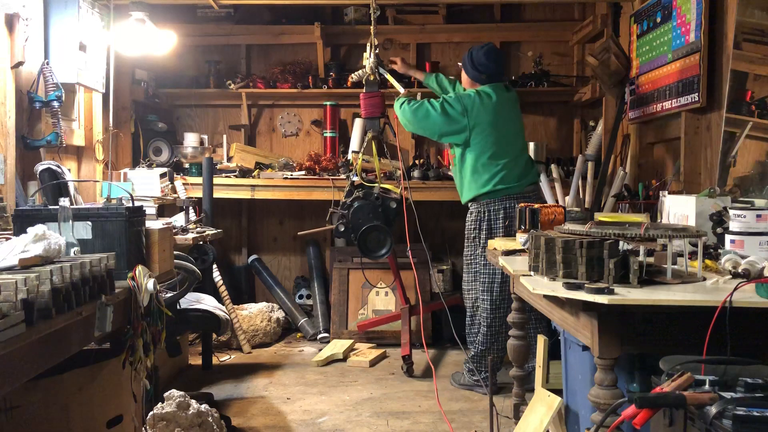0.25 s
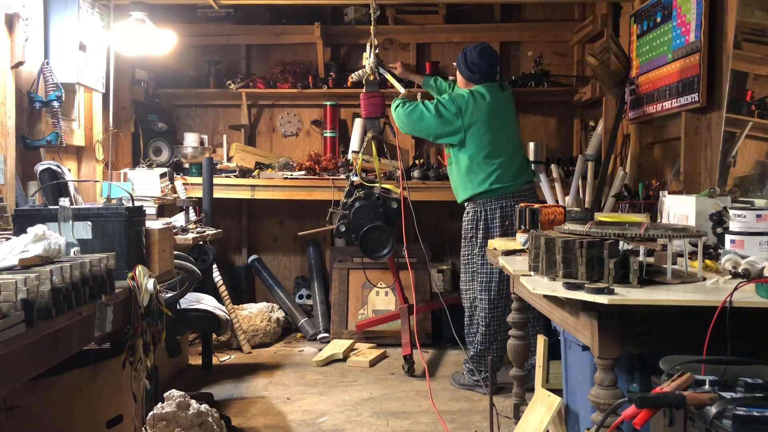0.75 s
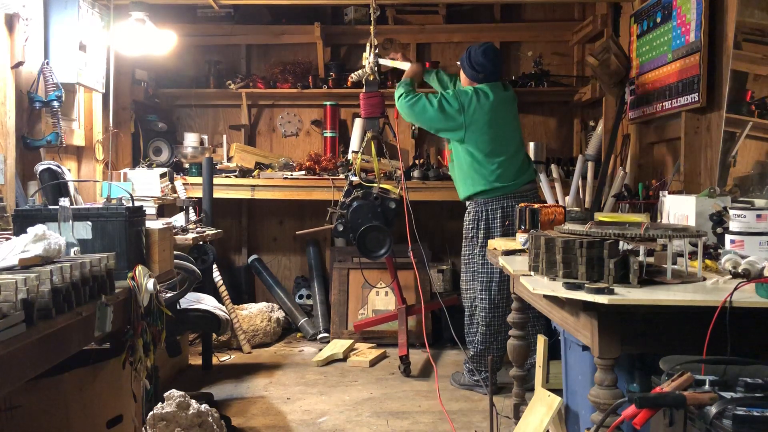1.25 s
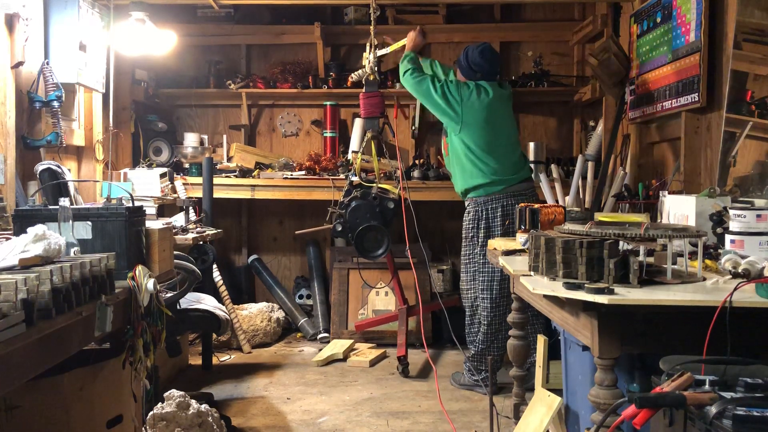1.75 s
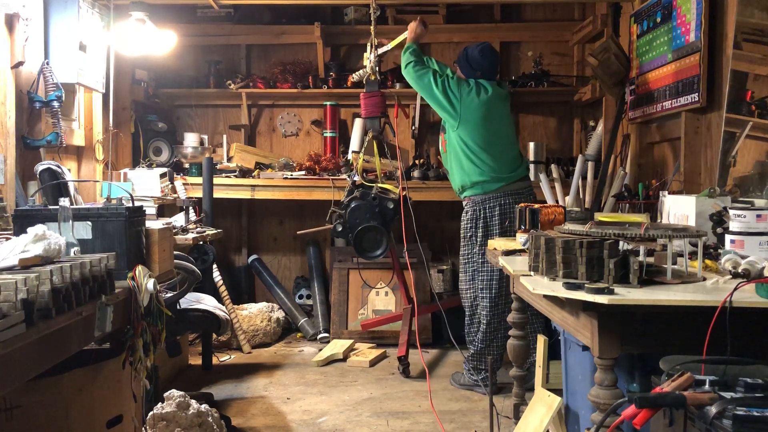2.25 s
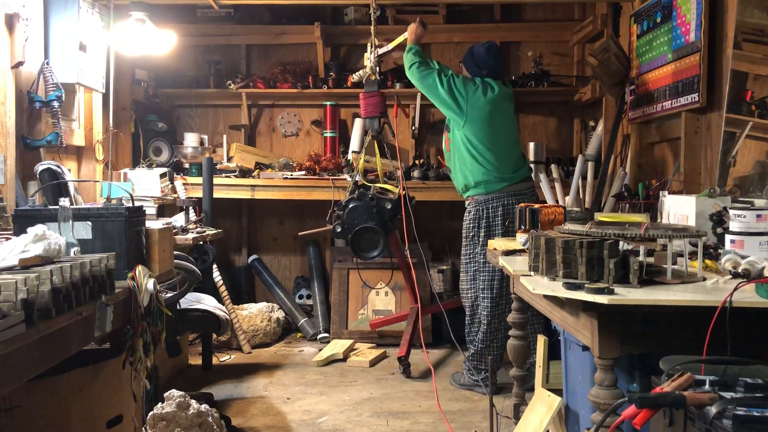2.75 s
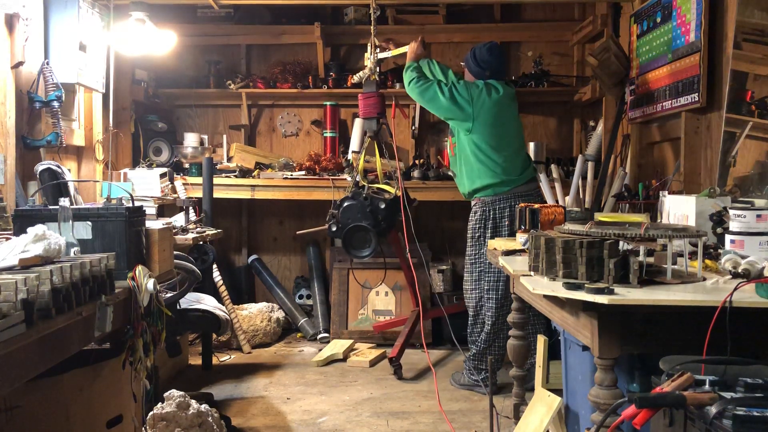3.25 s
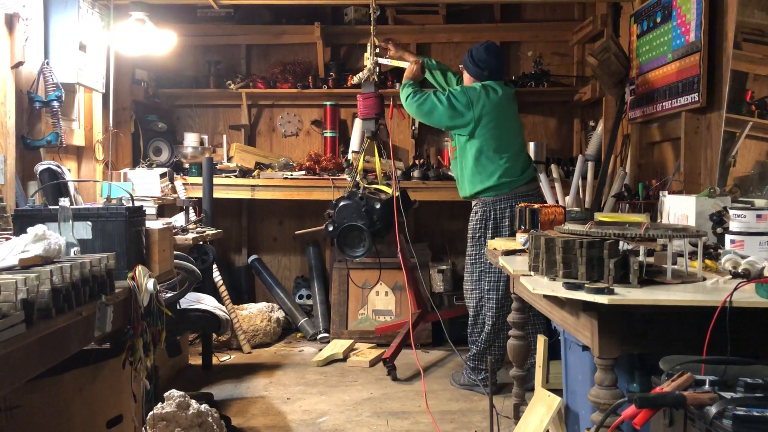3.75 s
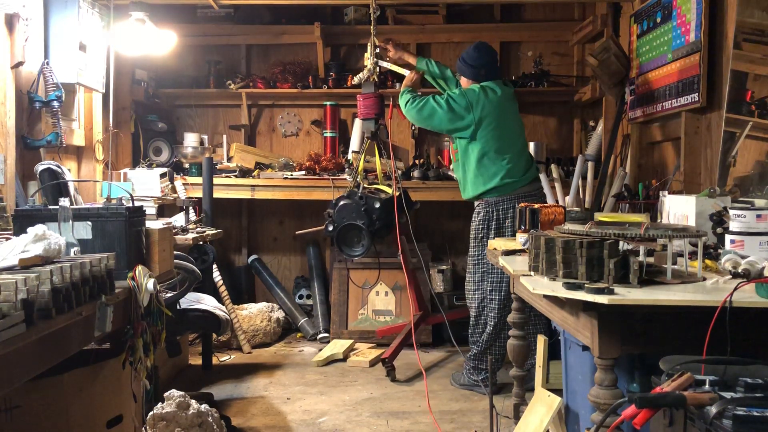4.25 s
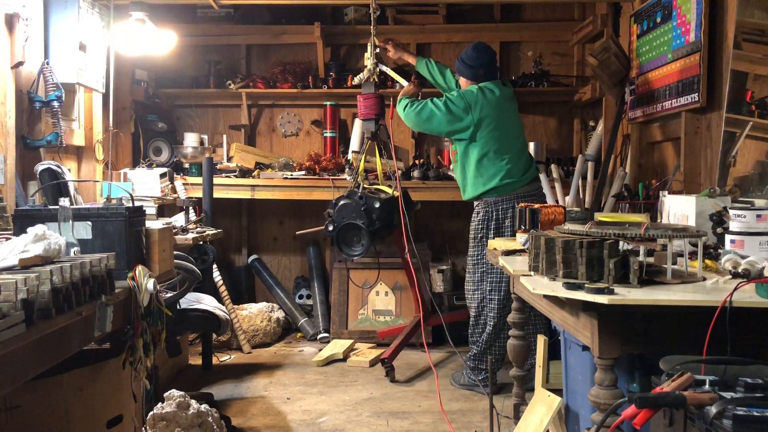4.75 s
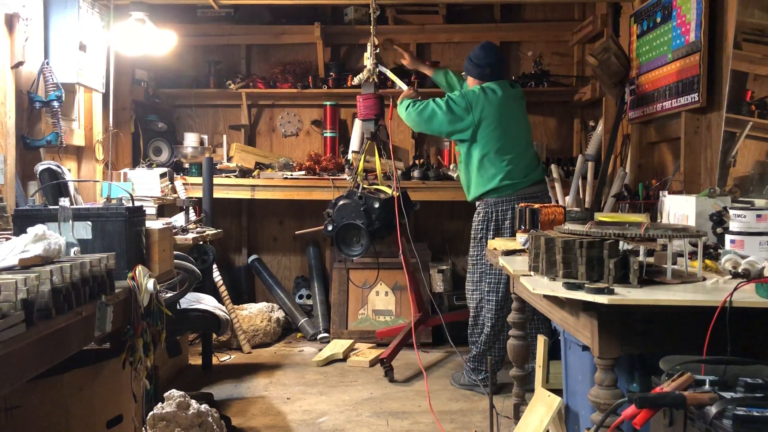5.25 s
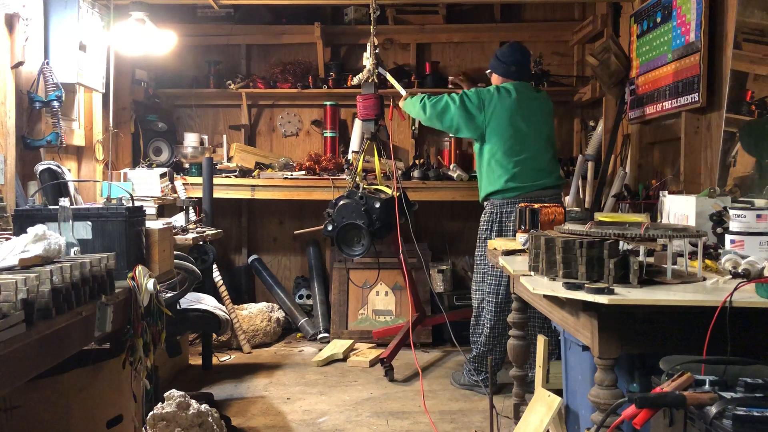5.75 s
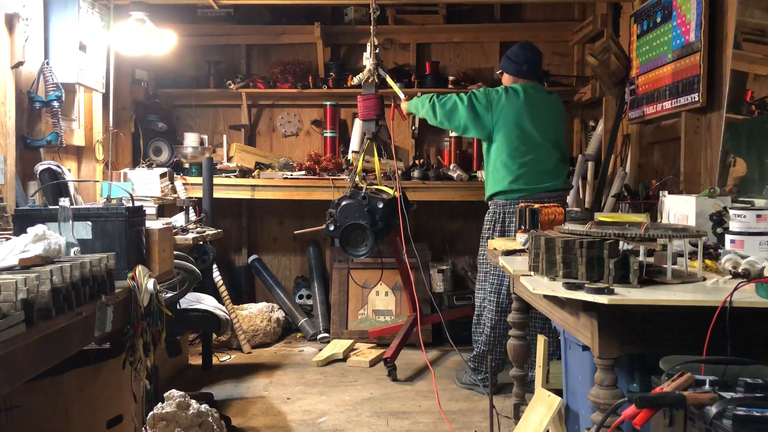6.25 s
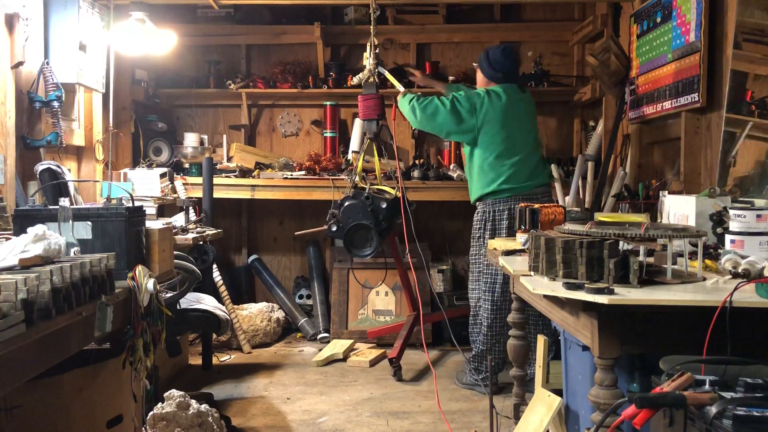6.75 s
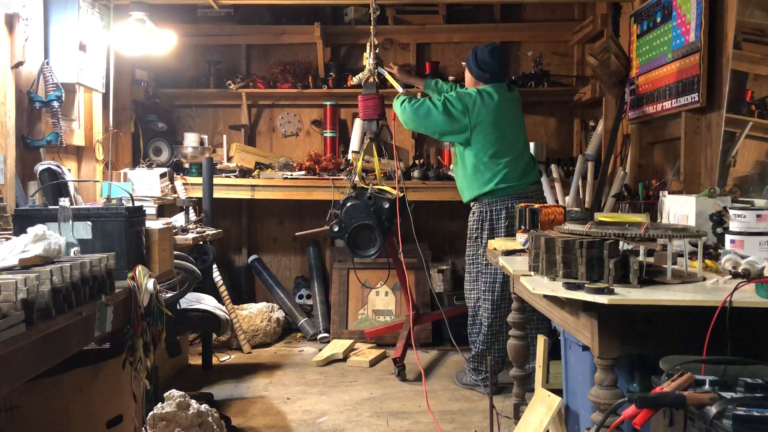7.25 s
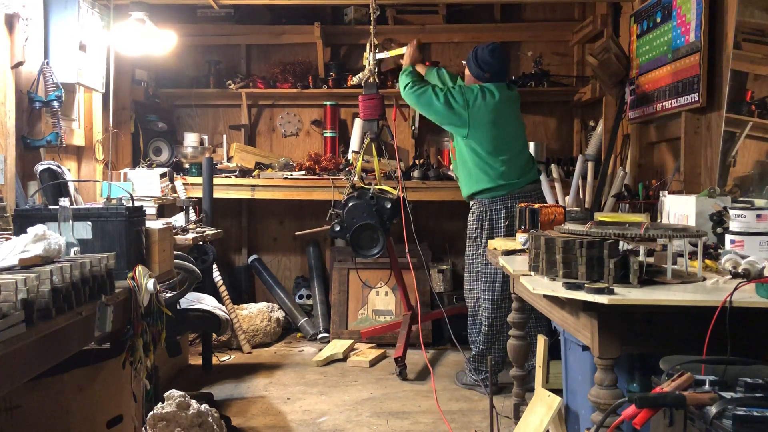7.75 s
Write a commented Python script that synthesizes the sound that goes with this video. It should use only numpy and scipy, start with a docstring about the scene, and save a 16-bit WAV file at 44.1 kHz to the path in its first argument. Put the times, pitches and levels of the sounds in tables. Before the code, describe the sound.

In a quiet, cluttered wooden workshop, faint cloth rustles and ticks give way to a loud steel ratchet snap, then a second brighter click. Loaded chain links knock and creak in a short stuttering run, a hook clinks sharply, more creaks and cloth rubs follow, and a final pair of ratchet clacks ends it. One distant microphone hears short room echo, soft air and a very faint mains hum.

```python
"""Strap and sleeve tick and rustle first, over still air and a faint mains hum in a wooden workshop.
Then a lever hoist is worked with an engine on its chain: pawls snap over the ratchet, the hook clinks,
loaded links knock, creak and squeal, and beam and floor boom. Steel is a crack plus decaying modes,
friction is shaped noise or uneven jerks, and all but air and hum pass through a synthetic room echo."""
import sys
import numpy as np
from scipy import signal
from scipy.fft import rfft, irfft
from scipy.io import wavfile
from scipy.ndimage import uniform_filter1d

SR = 44100
rng = np.random.default_rng(int(sys.argv[2]) if len(sys.argv) > 2 else 0)


def to_wav(s):
    """Save 16-bit WAV."""
    ch = np.atleast_2d(s).T  # columns
    pcm = np.round(np.clip(ch, -1, 1) * 32767)  # PCM
    wavfile.write(sys.argv[1], SR, pcm.astype(np.int16))


N = 352800
TAIL = SR // 2   # length of pulses, rings and room echo [samples]
AGE = np.arange(TAIL) / SR   # [s]
TIME = np.arange(N) / SR   # [s]

# Mode levels below are nominal: each ring scatters them, then is scaled as a whole.
# Still air of the workshop: (frequency [Hz], density [dB per Hz])
AIR_SPECTRUM = [(15, -43.5), (25, -12.5), (92, -1), (141, -1.5), (217, -4.5), (354, -6), (416, -9),
                (503, -8), (624, -12.5), (1790, -23), (2050, -24), (2220, -21.5), (2480, -27.5),
                (4370, -26), (16000, -40.5)]
AIR_DB = -62   # rms
# Mains hum: (frequency [Hz], rms level [dB])
HUM = [(60, -77), (119.5, -68.5)]
HUM_WAVER_DB = 1.5
# Reverberation time of the room: (frequency [Hz], decay by 60 dB [s])
SHOP_T60 = [(150, 0.29), (600, 0.4), (2000, 0.33), (4000, 0.31), (8000, 0.24), (16000, 0.18)]
CUTOFF_HZ = 15900

# Sleeve and strap rub: (time [s], length [s], level [dB])
RUBS = [(0.052, 0.11, -57), (0.328, 0.11, -64.5), (0.575, 0.13, -68.5), (1.191, 0.15, -65),
        (1.802, 0.069, -68.5), (2.409, 0.079, -70.5), (6.254, .17, -54.5), (6.423, 0.093, -54.5)]
# Small ticks of the strap fittings: (time [s], level [dB])
TICKS = [(0.04, -70), (0.346, -67.5), (5.6375, -73.5), (6.362, -59.5), (6.999, -86)]
# Colour of cloth and fittings: (frequency [Hz], density [dB per Hz])
CLOTH_SPECTRUM = [(300, -6), (900, -0.5), (1700, 1.5), (3000, -1), (4200, 0), (6500, -4), (9000, -9.5),
                  (16000, -15.5)]
FITTING_TICKS_PER_S = 40   # fittings that tick during a rub
BRISK_RUB_DB = -55   # reference level of a brisk rub
RUB_TILT_DB, RUB_BRIGHTENING = 1.84, .12   # brisk tilt [dB per octave]; its gain per dB of level

# The worker shifts weight on the floor: (time [s], level [dB])
FOOTFALLS = [(1.685, -59.5), (6.67, -62)]
# Floor boards: (frequency [Hz], level [dB], decay by 60 dB [s])
FLOOR_MODES = [(63.4, 6.5, 0.23), (86, -4, 0.14), (129.3, -1, 0.25)]
# Roof beam, shaken through the chain: (frequency [Hz], level [dB], decay by 60 dB [s])
BEAM_MODES = [(157.4, -6, .45), (170.6, -4, .35), (266.2, -0.5, .35), (288.5, -9.5, .3)]
JOLT_LAG_S = .01   # from the blow to the beam
FULL_JOLT_DB, JOLT_GROWTH = -47, 1.1   # boom after a full knock; dB of boom per dB of knock
PAWL_JOLT_DB = -31   # boom against the snap of the holding pawl

# Links slip under load: (time [s], length [s], creak level [dB], squeal level [dB])
SLIPS = [(1.35, 0.051, -57.5, -64), (3.479, .1, -56.5, -75.5), (3.59, 0.056, -49, -65.5),
         (3.666, 0.073, -49, -74), (3.726, 0.061, -45.5, -59.5), (3.816, 0.052, -48, -64),
         (6.101, 0.035, -56, -79), (6.129, 0.032, -47, -81), (6.191, 0.021, -45, -70),
         (6.392, 0.023, -66, -58), (6.652, 0.046, -52, -58), (7.895, 0.062, -55, -60.5)]
# Colour of the creak: (frequency [Hz], density [dB per Hz])
CREAK_SPECTRUM = [(100, -27), (250, -5.5), (420, 7.5), (600, 2.5), (880, -0.5), (1300, 3.5), (1800, -7),
                  (2250, -6.5), (3500, -14), (6000, -25), (9000, -35.5), (16000, -47)]
# Ringing of the creak: (frequency [Hz], level [dB], decay by 60 dB [s])
CREAK_MODES = [(400, 2.5, 0.013), (1252, 3.5, 0.0077), (1515, -6, 0.08), (2133, -5.5, 0.06),
               (2730, -12.5, 0.046)]
# Squealing high modes: (frequency [Hz], relative level [dB])
SQUEAL_MODES = [(9680, 0), (11800, -7), (13950, -1), (15620, -1)]
HARD_SLIP_DB = -47   # creak level of a slip under the full load
SLIP_TILT_DB, SLIP_BRIGHTENING = 1.3, 0.33   # hard tilt [dB per octave]; its gain per dB of level

# Loaded links settle: (time [s], level [dB])
LINK_KNOCKS = [(2.008, -61), (2.9093, -45.5), (3.398, -46.5), (3.594, -61), (4.1986, -57), (4.5035, -59.5),
               (4.854, -59.5), (6.133, -62.5)]
# Crack of a link: (frequency [Hz], density [dB per Hz])
LINK_CRACK = [(100, -19.5), (250, -6), (520, -3.5), (1150, -0.5), (1700, -5.5), (2400, -8.5), (3500, -13.5),
              (6000, -19.5), (10000, -26), (16000, -32)]
# Ringing of a link: (frequency [Hz], level [dB], decay by 60 dB [s])
LINK_MODES = [(427, -2.5, .1), (652, 0.5, 0.15), (814, -1.5, .1), (1146, 3.5, 0.078), (1300, 2.5, 0.078),
              (1482, -6, .1), (2200, -12, 0.069), (2450, -13, 0.046)]
FULL_KNOCK_DB = -45   # a knock under the full load
KNOCK_TILT_DB = 1   # brightness [dB per octave]
KNOCK_RING_DB, KNOCK_RING_GROWTH = -1, 0.41   # full knock's ring against its crack; gain per dB of level

# Hook against chain: (time [s], level [dB], brightness [dB per octave], ring against crack [dB])
HOOK_CLINKS = [(0.742, -67.5, -5, -7.5), (5.0447, -33.5, 2.6, -3)]
# Crack of the hook: (frequency [Hz], density [dB per Hz])
HOOK_CRACK = [(200, -16), (900, -32), (1700, -14), (2200, 1), (3600, -2), (5200, 0), (6100, -7), (8500, -5),
              (12000, -14), (15500, -9.5)]
# Ringing of the hook: (frequency [Hz], level [dB], decay by 60 dB [s])
HOOK_MODES = [(2190, -9, .24), (2330, -13, .1), (2600, -1, .06), (2628, -7, .2), (3618, -15, .2),
              (3780, -12, .13), (3986, -14, .18), (4836, -13, .18), (4990, -8, .08), (5160, -11, .06),
              (7030, -22, .6), (8000, -15, .17), (8730, -15, .15), (9170, -12, .06), (10238, -12, .04),
              (10400, -25, .5), (12916, -14, .05), (14002, -13, .04), (15116, -11, .05)]

# Driving pawl on the back stroke:
# (time [s], level [dB], brightness [dB per octave], ring against crack [dB])
DRIVE_SNAPS = [(1.4530, -38.5, 6, -8.5), (7.6653, -44, 0, -4.5)]
# Crack of the driving pawl: (frequency [Hz], density [dB per Hz])
DRIVE_CRACK = [(150, -33), (380, 0), (650, -15), (1100, 1), (2400, -1), (3200, 9.5), (4500, 6),
               (5800, -2.5), (6800, -5.5), (10000, -10), (11200, -23.5), (16000, -21)]
# Ringing of the driving pawl: (frequency [Hz], level [dB], decay by 60 dB [s])
DRIVE_MODES = [(400, -14, .1), (1810, -7, .3), (2710, -13, .1), (3098, -1, .07), (3230, -4, .18),
               (3708, -7, .13), (4174, -5, .1), (4420, -3, .12), (5062, -6, .07), (5696, -8, .13),
               (8240, -10, .08)]
# Ratchet wheel, damped by the sliding pawl: (frequency [Hz], level [dB], decay by 60 dB [s])
WHEEL_MODES = [(1812, 0, .2), (2180, -5, .12), (2635, -3, .08), (2710, -3, .08), (3200, -6, .02),
               (4200, -5, .01)]
DRAG_S, DRAG_DB = .3, -67   # the driving pawl rides up a tooth before it snaps

# Holding pawl drops into a tooth:
# (time [s], level [dB], brightness [dB per octave], ring against crack [dB])
HOLD_SNAPS = [(0.9219, -29, 2, -6), (7.2285, -35, 2.5, -4.5)]
# Crack of the holding pawl: (frequency [Hz], density [dB per Hz])
HOLD_CRACK = [(120, -21.5), (350, -3), (620, -8.5), (1200, -6.5), (2000, 2), (2800, -0.5), (3500, 2.5),
              (4700, 2), (5700, -2.5), (7800, -2.5), (9000, -3.5), (10200, 2), (12500, -6), (16000, -10.5)]
# Ringing of the holding pawl: (frequency [Hz], level [dB], decay by 60 dB [s])
HOLD_MODES = [(388, -9, .08), (1180, -12, .03), (1502, -12, .17), (1796, -9, .26), (1942, -10, .08),
              (2182, -5, .1), (2608, -3, .22), (3218, -5, .14), (3406, -9, .14), (3672, -7, .17),
              (4664, -3, .06), (4828, -9, .14), (5854, -11, .17), (6670, -11, .08), (7464, -8, .09),
              (8046, -4, .06), (9774, -7, .04), (9958, 0, .035), (10364, -5, .09), (10784, -7, .06),
              (11960, -8, .05)]
EDGE_S, EDGE_DB = .02, -25.5   # scrape over the tooth's edge; level against the snap


def from_db(db):
    """Decibels to gain."""
    return 10 ** (np.asarray(db) / 20)


def unit(x):
    """Scale to energy 1."""
    return x / np.sqrt(np.sum(x ** 2) + 1e-20)


def rms_one(x):
    """Scale to rms 1."""
    return unit(x) * np.sqrt(len(x))


def at_hz(points, hz):
    """Read a table on a log-frequency axis."""
    f, value = np.transpose(points)
    return np.interp(np.log(np.maximum(hz, 1)), np.log(f), value)


def add(out, s, sound):
    """Mix a sound in at time s."""
    i = max(0, round(s * SR))
    out[i:i + len(sound)] += sound[:max(0, N - i)]


def drift(rate, size):
    """Random wander: straight lines between normal draws, rate draws per second."""
    knots = rng.standard_normal(int(size / SR * rate) + 2)
    return np.interp(np.arange(size) / SR * rate, np.arange(len(knots)), knots)


def stroke(length, edge=.2):
    """Envelope of a short slide, with soft ends."""
    u = np.linspace(0, 1, int(length * SR))
    return np.clip(np.minimum(u, 1 - u) / edge, 0, 1)


def pulse(spectrum, tilt_db=0):
    """The shortest causal pulse with this spectrum, tilted per octave (minimum phase)."""
    hz = np.arange(1, TAIL // 2 + 2) * SR / TAIL
    level_db = at_hz(spectrum, hz) + tilt_db * np.log2(hz)
    cepstrum = irfft(np.log(from_db(level_db)), TAIL)
    # folding the cepstrum forward in time makes the pulse causal
    cepstrum[1:TAIL // 2] *= 2
    cepstrum[TAIL // 2 + 1:] = 0
    return unit(irfft(np.exp(rfft(cepstrum)), TAIL))


def ring(modes, scatter_db=2.0):
    """Decaying modes, each struck with a random strength and sign."""
    total = np.zeros(TAIL)
    for hz, db, t60 in modes:
        strength = from_db(db + scatter_db * rng.normal()) * rng.choice([-1, 1])
        mode = np.sin(2 * np.pi * hz * AGE) * from_db(-60 * AGE / t60)
        total += strength * unit(mode)
    return unit(total)


def workshop(x, direct_db=-17, build_s=0.001277, near_db=6.0, near_s=0.014, size=70):
    """A weak direct path, strong echoes off the nearest shelves, then a tail that dies sooner in the treble."""
    hz = np.arange(TAIL // 2 + 1) * SR / TAIL
    white = rfft(rng.standard_normal(TAIL))
    # half-octave bands, each with its own decay
    centres = 2 ** (np.round(2 * np.log2(np.maximum(hz, SR / 2 ** 8))) / 2)
    tail = np.zeros(TAIL)
    for centre in np.unique(centres):
        band = irfft(white * (centres == centre), TAIL)
        tail += band * from_db(-60 * AGE / at_hz(SHOP_T60, centre))
    build_up = 1 - np.exp(-AGE / build_s)
    near_boost = from_db(near_db * np.exp(-(AGE / near_s) ** 2))
    paths = rfft(tail * build_up * near_boost, 2 * TAIL)
    paths /= np.sqrt(uniform_filter1d(np.abs(paths) ** 2, size))   # a cluttered room favours no band
    response = unit(irfft(paths)[:TAIL])
    response[0] += from_db(direct_db)
    return signal.fftconvolve(x, response)


def blow(body, level_db, near_db=3.5):
    """One blow heard across the room; its level is the rms of its energy spread over a tenth of a second."""
    return from_db(level_db) * np.sqrt(SR / 10) * unit(workshop(body, near_db=near_db))


def strikes(events, crack, modes, bounce_s, bounce_db, near_db):
    """Steel meets steel: a crack, a quick rebound and the ringing of the part."""
    out = np.zeros(N)
    for s, level_db, tilt_db, ring_db in events:
        contact = pulse(crack, tilt_db)
        rebound = from_db(bounce_db) * np.interp(AGE - bounce_s, AGE, contact, left=0)
        body = unit(contact + rebound) + from_db(ring_db) * ring(modes)
        add(out, s, blow(body, level_db, near_db))
    return out


def booms(events, modes, swell_s):
    """Jolts swell into a low boom of the timber."""
    out = np.zeros(N)
    for s, level_db in events:
        swell = 1 - np.exp(-AGE / swell_s)
        add(out, s, blow(ring(modes) * swell, level_db))
    return out


def background():
    """Still air as shaped noise, and a mains hum whose partials waver a little in level."""
    noise = rng.standard_normal(N + TAIL)
    air = rms_one(signal.fftconvolve(noise, pulse(AIR_SPECTRUM))[TAIL:TAIL + N])
    hum = np.zeros(N)
    for hz, db in HUM:
        level = from_db(db + HUM_WAVER_DB * drift(5.5, N))
        hum += level * np.sqrt(2) * np.sin(2 * np.pi * hz * TIME)
    return from_db(AIR_DB) * air + hum


def strap(grain_db=8.5, fitting_tick_db=25.0, tick_tilt_db=3.5):
    """Cloth fibres catch in fine grains while the fittings tick now and then, brighter when brisk; the fittings
    also tick alone."""
    out = np.zeros(N)
    for s, length, level_db in RUBS:
        push = stroke(length, edge=0.28)
        n = len(push)
        tilt_db = RUB_TILT_DB + RUB_BRIGHTENING * (level_db - BRISK_RUB_DB)
        fibres = rms_one(rng.standard_normal(n) * from_db(grain_db * drift(900, n)))
        fitting_ticks = from_db(fitting_tick_db) * (rng.random(n) < FITTING_TICKS_PER_S / SR)
        friction = rms_one(push * (fibres + fitting_ticks))
        rub = signal.fftconvolve(friction, pulse(CLOTH_SPECTRUM, tilt_db))
        add(out, s, from_db(level_db) * workshop(rub))
    for s, level_db in TICKS:
        add(out, s, blow(pulse(CLOTH_SPECTRUM, tick_tilt_db), level_db))
    return out


def timber():
    """Each knock, and each catch of the holding pawl, jolts the roof beam; feet press the floor boards."""
    jolts = []
    for s, db in LINK_KNOCKS:
        jolts.append((s + JOLT_LAG_S, FULL_JOLT_DB + JOLT_GROWTH * (db - FULL_KNOCK_DB)))
    for s, db, *_ in HOLD_SNAPS:
        jolts.append((s + JOLT_LAG_S, db + PAWL_JOLT_DB))
    beam = booms(jolts, BEAM_MODES, swell_s=.005)
    floor = booms(FOOTFALLS, FLOOR_MODES, swell_s=0.014)
    return beam + floor


def link_creak(n, creak_db, slips_per_s=170.0, uneven=.45, size_db=2.0, relax_db=7.0, ring_db=-2.0):
    """Links stick and slip in uneven jerks that excite the steel, weakening as the strain is relieved."""
    tilt_db = SLIP_TILT_DB + SLIP_BRIGHTENING * (creak_db - HARD_SLIP_DB)
    push = stroke(n / SR + .5 / SR, edge=0.051) * from_db(-relax_db * np.arange(n) / n)
    turns = np.cumsum(slips_per_s * np.exp(uneven * drift(slips_per_s, n))) / SR
    # one impulse per whole turn, each of its own size
    jerks = np.diff(np.floor(turns + .5), prepend=0) * from_db(size_db * rng.standard_normal(n))
    body = unit(pulse(CREAK_SPECTRUM, tilt_db) + from_db(ring_db) * ring(CREAK_MODES))
    return signal.fftconvolve(jerks * push, body)


def link_squeal(n, waver_hz=80.4, flutter_db=-1.0):
    """The dry contact squeals in its high modes, unsteady in pitch and level."""
    squeal = np.zeros(n)
    for hz, db in SQUEAL_MODES:
        level = from_db(db + flutter_db * drift(52, n))
        phase = 2 * np.pi * np.cumsum(hz + waver_hz * drift(197, n)) / SR
        squeal += level * np.sin(phase)
    return squeal * stroke(n / SR + .5 / SR, edge=0.041)   # the half sample guards the rounding


def grinding():
    """Links break loose under load, creaking and squealing together in each slip."""
    out = np.zeros(N)
    for s, length, creak_db, squeal_db in SLIPS:
        n = int(length * SR)
        add(out, s, from_db(creak_db) * np.sqrt(n) * unit(workshop(link_creak(n, creak_db))))
        add(out, s, from_db(squeal_db) * np.sqrt(n) * unit(workshop(link_squeal(n))))
    return out


def link_knocks():
    """Loaded links settle with a knock; a harder knock rings more."""
    events = []
    for s, db in LINK_KNOCKS:
        ring_db = KNOCK_RING_DB + KNOCK_RING_GROWTH * (db - FULL_KNOCK_DB)
        events.append((s, db, KNOCK_TILT_DB, ring_db))
    return strikes(events, LINK_CRACK, LINK_MODES, bounce_s=.005, bounce_db=-10.0, near_db=7.0)


def hook_clinks():
    """The hook strikes the chain, rebounds and rings."""
    return strikes(HOOK_CLINKS, HOOK_CRACK, HOOK_MODES, bounce_s=0.011, bounce_db=-16.0, near_db=7.0)


def pawl_drag(catch_db=3.0):
    """The driving pawl slides unevenly up a tooth before each snap, keeping the wheel's modes faintly singing."""
    out, wheel = np.zeros(N), ring(WHEEL_MODES)
    for s, *_ in DRIVE_SNAPS:
        push = stroke(DRAG_S, edge=0.21)
        n = len(push)
        friction = rng.standard_normal(n) * from_db(catch_db * drift(55, n))
        drag = workshop(signal.fftconvolve(push * friction, wheel))
        add(out, s - DRAG_S, from_db(DRAG_DB) * np.sqrt(n / 2) * unit(drag))
    return out


def driving_pawl():
    """The driving pawl snaps over a tooth on the back stroke, rebounds and rings."""
    return strikes(DRIVE_SNAPS, DRIVE_CRACK, DRIVE_MODES, bounce_s=0.012, bounce_db=-10.0, near_db=4.5)


def pawl_edge(grain_db=8.0, tilt_db=-5.0):
    """The holding pawl scrapes in rough grains over the edge of the tooth just before it drops."""
    out, push = np.zeros(N), stroke(EDGE_S)
    n = len(push)
    for s, level_db, *_ in HOLD_SNAPS:
        grains = rms_one(push * rng.standard_normal(n) * from_db(grain_db * drift(900, n)))
        scrape = signal.fftconvolve(grains, pulse(HOLD_CRACK, tilt_db))
        add(out, s - EDGE_S, from_db(level_db + EDGE_DB) * workshop(scrape))
    return out


def holding_pawl():
    """The holding pawl drops into a tooth, rebounds and rings."""
    return strikes(HOLD_SNAPS, HOLD_CRACK, HOLD_MODES, bounce_s=0.0067, bounce_db=-14.5, near_db=5.0)


def scene():
    """The room, the load and the hoist, mixed to one channel."""
    surroundings = background() + strap() + timber()
    load = grinding() + link_knocks() + hook_clinks()
    ratchet = pawl_drag() + driving_pawl() + pawl_edge() + holding_pawl()
    return (surroundings + load + ratchet)[None]


def record(dry):
    """The microphone sheds the deepest rumble; the top is cut steeply."""
    thin = signal.sosfilt(signal.butter(2, 30, "high", fs=SR, output="sos"), dry)
    return signal.sosfilt(signal.ellip(10, .2, 80, CUTOFF_HZ, fs=SR, output="sos"), thin)


dry = scene()
out = record(dry)
to_wav(out)
```